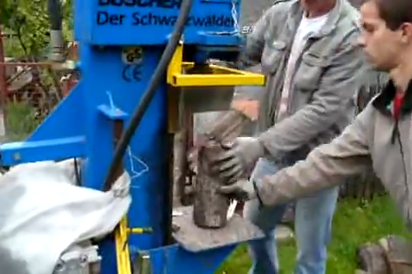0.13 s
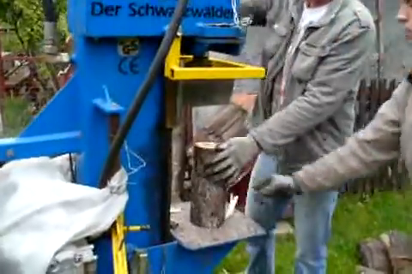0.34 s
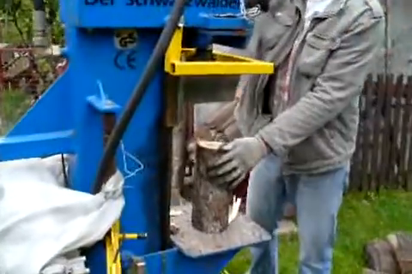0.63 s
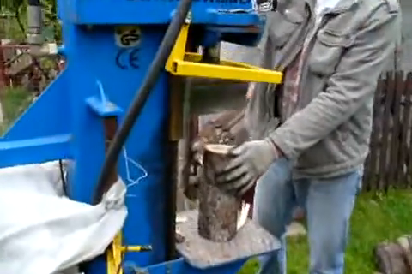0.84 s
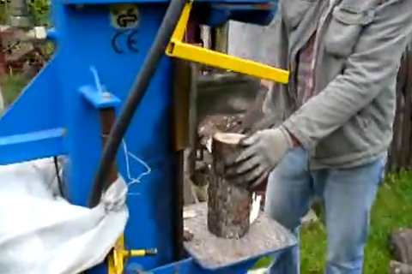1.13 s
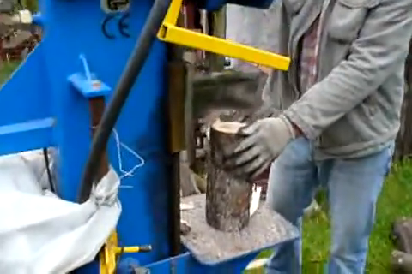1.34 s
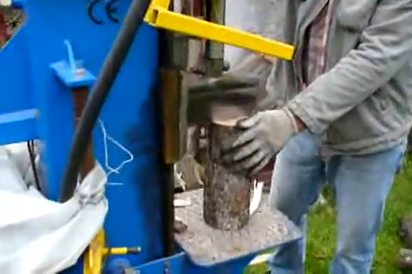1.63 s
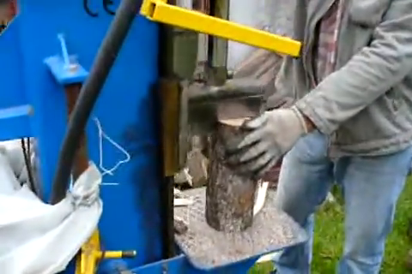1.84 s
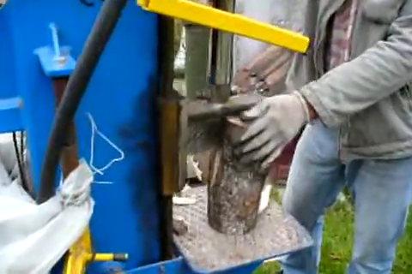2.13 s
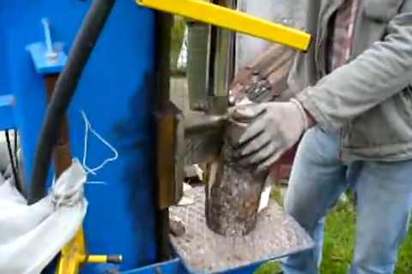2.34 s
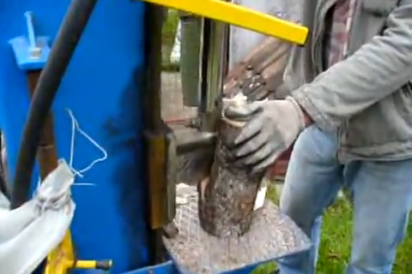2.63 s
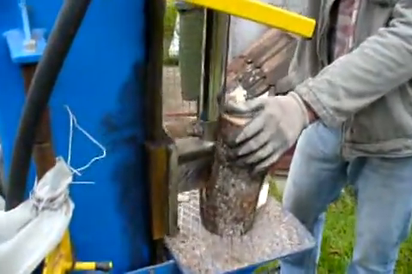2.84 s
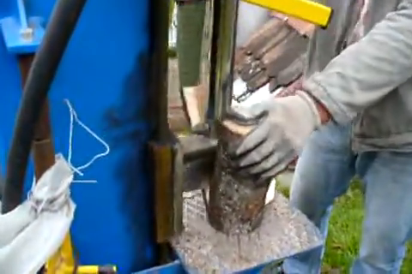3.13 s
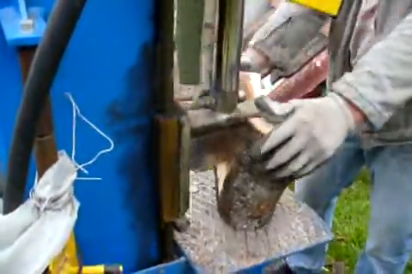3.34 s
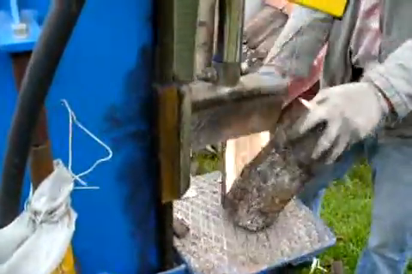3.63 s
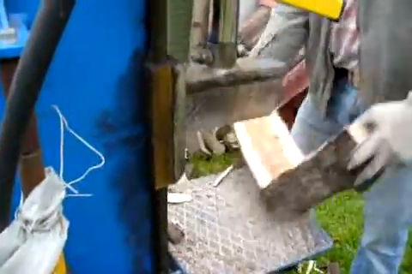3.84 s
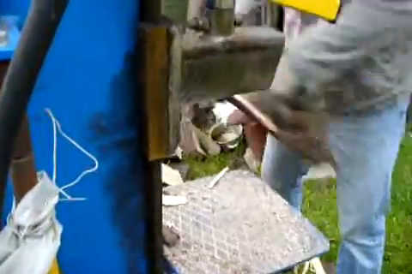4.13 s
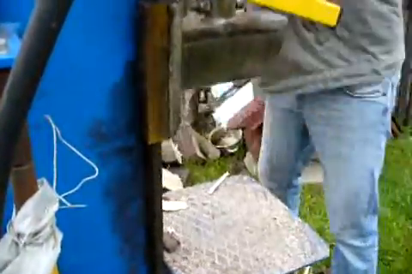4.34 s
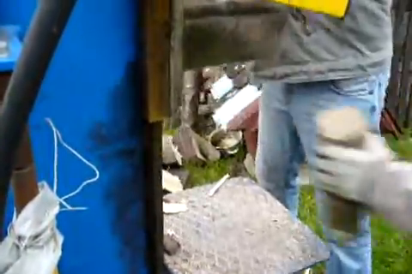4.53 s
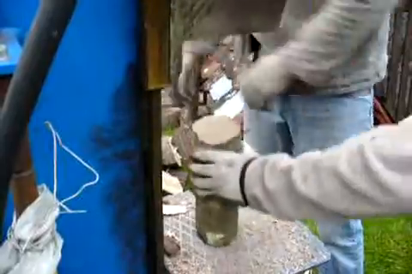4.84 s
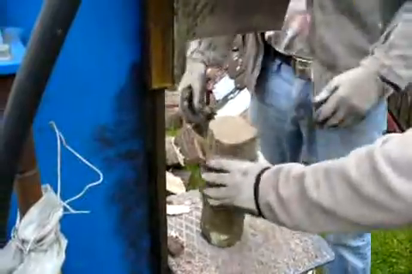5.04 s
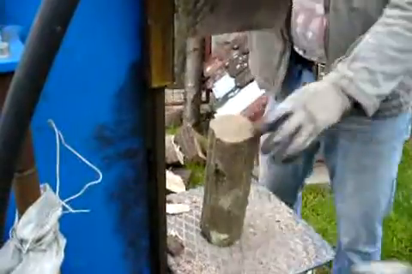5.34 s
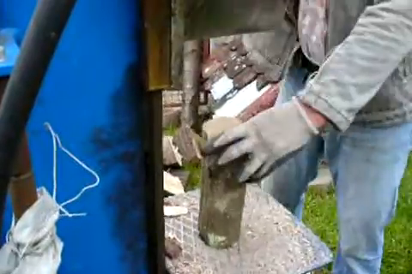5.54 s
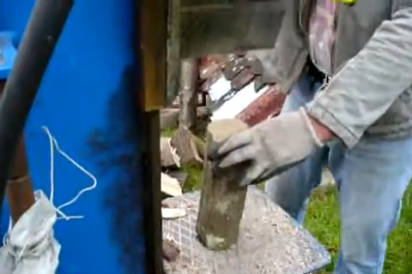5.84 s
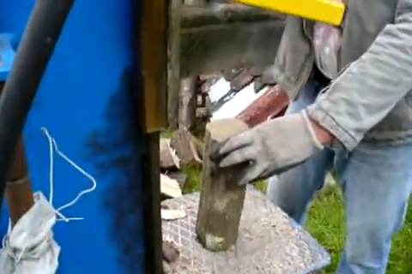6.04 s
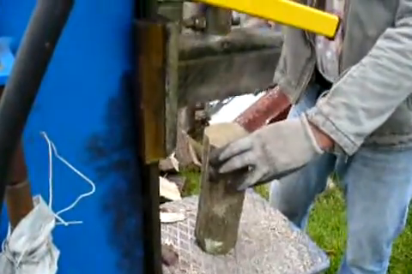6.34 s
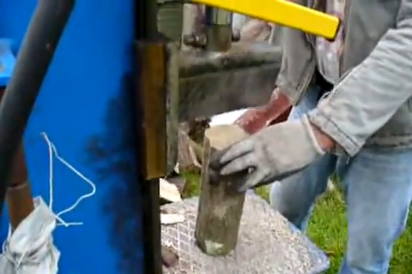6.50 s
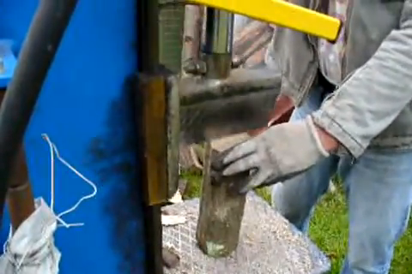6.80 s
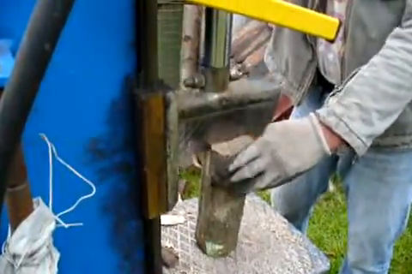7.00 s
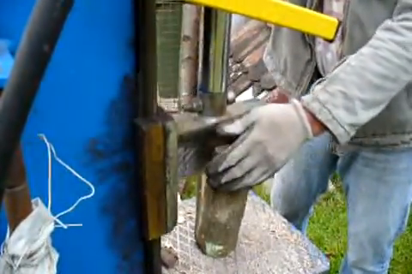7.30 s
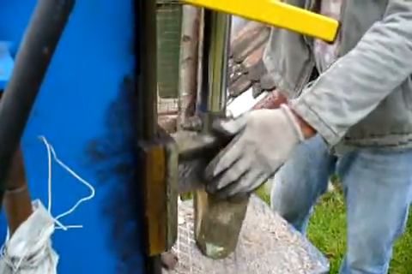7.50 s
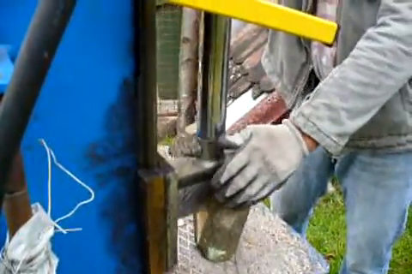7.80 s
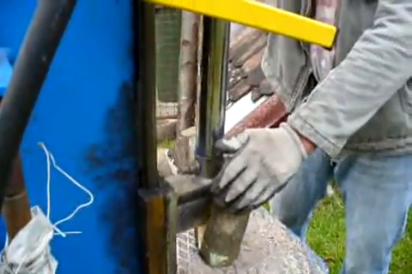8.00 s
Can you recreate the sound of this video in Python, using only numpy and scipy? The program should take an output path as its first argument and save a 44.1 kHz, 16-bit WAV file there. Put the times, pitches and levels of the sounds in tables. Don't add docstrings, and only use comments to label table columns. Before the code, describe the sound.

A diesel engine drones close by for all eight seconds, throbbing low with rough clatter, ringing gear whirr and a tonal hydraulic pump whine. At about 0.6 to 0.8 s small lever ticks and short oil hisses start the ram. Around 1.7 s a rapid cluster of woody knocks leads into violent, clipped cracks until 1.9 s, with tearing fibre and scattered snaps to 2.7 s. At 3.1 s the halves part with a hollow clack. The engine pitch sags slightly during the return, lowest near 4.3 s. A new log knocks on the steel table from 4.6 to 5.1 s. At 5.8 s come another knock, snap and oil hiss; the pump strains, and from 7.0 to 8.0 s the second log cracks, crackles and tears, with strong snaps near 7.0, 7.4 and 7.6 s. The sound is dull, band-limited and overloaded, with a faint close echo.

```python
import sys
import numpy as np
from scipy import signal
from scipy.io import wavfile
from scipy.ndimage import uniform_filter1d

SR = 44100
rng = np.random.default_rng(int(sys.argv[2]) if len(sys.argv) > 2 else 0)


def to_wav(sig):
    pcm = np.clip(np.atleast_2d(sig), -1, 1) * 32767
    pcm = np.round(pcm).astype(np.int16)
    wavfile.write(sys.argv[1], SR, pcm.T)


def attenuation_scalar(level_db):
    decades = np.asarray(level_db, float) / 20
    return 10 ** decades


N = 359849

# (multiple of the engine cycle [1], level [dB])
EXHAUST_ORDERS = [(1, -30.5), (2, -27.5), (3, -28), (4, -18), (5, -14), (6, 2), (7, -2.5), (8, -20),
                  (9, 4.5), (10, -15), (11, -18), (12, 7.5), (13, -14.5), (14, 0), (15, -11), (16, -2),
                  (17, -18.5), (18, -3.5), (19, -13), (20, -12), (21, -1), (22, -14), (23, -17), (24, -17),
                  (25, -12), (26, -17.5), (27, -6), (28, -20), (29, -1.5), (30, -16.5)]
# (frequency [Hz], level per hertz [dB])
BLOCK_SPECTRUM = [(25, -24.5), (45, -8.5), (124, -7), (270, -6), (500, -3.5), (800, -8), (1030, -8),
                  (1310, -10.5), (1700, -12.5), (2200, -12.5), (3150, -12), (3800, -19.5), (4500, -18.5),
                  (5300, -23)]
# (time [s], twelfth order of the cycle [Hz])
ENGINE_SPEED = [(0, 134.5), (1.1, 135), (1.9, 133.6), (3.2, 133.5), (3.6, 131.3), (4.3, 129.7),
                (5.0, 130.4), (5.6, 133.6), (7.1, 133.5), (7.5, 132.7), (8.16, 133)]
# (frequency [Hz], width [Hz], level [dB], part [name])
LOADED_RINGS = [(1319, 46, -0.3, "upper case"), (1683, 36, -0.5, "ram guide"),
                (1541, 30, -0.5, "ram guide"), (1263.3, 37, 0.5, "lower case"),
                (1679, 21, -12, "third mesh"), (1297, 11, -14, "third mesh"),
                (1279, 6.9, -12.5, "upper case"), (1892, 44, -2, "third mesh"),
                (1417, 45, -5, "third mesh"), (3717, 80, -16.5, "third mesh"),
                (4220, 75, -17, "third mesh"), (3230, 59, 1.5, "fifth mesh"), (2559, 65, -1, "fifth mesh"),
                (2512, 76, -9.5, "third mesh"), (4800, 40, -2, "fifth mesh")]
# (frequency [Hz], width [Hz], level [dB])
CASE_RINGS = [(627, 38, -32.5), (795, 36, -32.5), (970, 5.8, -54), (1935, 32, -34), (2376, 16, -40),
              (2802, 46, -45.5)]
# (rest [dB], down [dB], split [dB], back [dB])
SHAFT_THROB = [2.4, 2.4, 3, 1.2]
# (start [s], stroke [name])
RAM_STROKES = [
    (0, "rest"),
    (0.762, "down"),
    (1.758, "split"),
    (3.2, "back"),
    (4.919, "rest"),
    (5.8, "down"),
    (6.979, "split"),
]
# (time [s], share of the way [0-1])
LISTENER_WALK = [(0, 0.09), (1.4, 0.1), (1.9, 0.29), (4.5, 1), (6.2, 0.8), (8.16, 0.8)]
PART_LEVELS = {"exhaust": ([-25, -26, -27.5, -27], -2), "rumble": ([-25.5, -26, -26, -26.5], -1.4),
               "clatter": ([-27.5, -28.5, -28.5, -27.5], 0.96), "housing": ([-35.5, -36, -38.5, -47.5],
               7.9), "upper case": ([-31.5, -26, -21, -25], -7), "lower case": ([-35.5, -35.5, -41.5, -31],
               7.1), "third mesh": ([-43, -42, -35.5, -26], 0.29), "fifth mesh": ([-35, -35.5, -35, -35.5],
               -3.4), "ram guide": ([-53, -35, -42.5, -44.5], -2.1)}
# (time [s], level [dB])
OIL_PRESSURE = [(0, -44), (.9, -35.5), (1.6, -44.5), (1.75, -24.5), (2.4, -31.5), (3.1, -24.5), (3.3, -58),
                (4.6, -43.5), (5.6, -32.5), (6.1, -33), (6.35, -25), (7.0, -20.5), (7.06, -29), (7.15, -26),
                (7.7, -22.5), (7.94, -29.5), (8.01, -25), (8.16, -21)]
# (start [s], length [s], boost [dB])
LINE_SURGES = [
    (0.614, 0.97, 10.5),
    (3.508, 1.4, 5),
    (5.004, 0.37, 6),
    (6.962, 0.18, 14.5),
    (7.166, 0.19, 13),
]
# (start [s], length [s], frequency [Hz], level [dB])
VALVE_HISSES = [
    (0.56, 0.089, 1300, -28),
    (0.786, 0.3, 1625, -32),
    (5.8, 0.29, 1630, -28),
]
# (start [s], length [s], level [dB])
FIBRE_TEARS = [
    (1.835, 0.14, -22),
    (2.596, 0.14, -25),
    (7.03, 0.42, -29),
    (7.555, 0.4, -29),
]
# (time [s], peak [dB], frequency [Hz], contact length [s])
LOG_KNOCKS = [(1.707, -8, 560, 0.006), (1.716, -6, 780, 0.011), (1.7265, -7, 840, 0.0067),
              (1.736, -9, 885, 0.008), (1.7435, -10, 800, 0.004), (2.128, -14, 747, 0.012),
              (3.117, -14, 1250, 0.005), (3.127, -13, 1000, .005), (3.1475, -7, 810, 0.007),
              (4.572, -10, 853, 0.0076), (4.861, -12, 560, 0.005), (4.867, -17, 1300, 0.003),
              (4.917, -9, 600, 0.004), (4.933, -16, 2020, 0.004), (4.9365, -10, 600, 0.005),
              (4.957, -14, 760, 0.01), (5.055, -12, 600, 0.004), (5.132, -13, 680, 0.012),
              (5.784, -11.5, 565, 0.011), (6.972, -11, 1200, .003), (6.9885, -10, 840, 0.004),
              (6.995, -10.5, 900, 0.003), (7.0011, -6, 810, 0.007), (7.136, -12, 1200, .004),
              (7.4358, -10, 1210, 0.002), (7.601, -6.5, 820, 0.0054)]
# (time [s], peak [dB], frequency [Hz], decay
# t60 [s])
SMALL_CRACKS = [(0.158, -20, 2310, 0.041), (1.8617, -12.5, 2300, 0.01), (1.8721, -15, 3140, 0.009),
                (1.905, -13, 3220, 0.0092), (1.9195, -2, 2630, 0.0057), (1.9192, -0.5, 4060, 0.0033),
                (2.0108, -14, 3260, 0.011), (2.0948, -16.5, 3600, 0.0061), (2.193, -12, 3200, 0.0051),
                (2.2474, -22, 3240, 0.0087), (2.4629, -16.5, 3230, 0.0087), (2.5273, -18, 2830, 0.008),
                (2.6071, -24, 2900, 0.0088), (2.6495, -9.5, 2760, 0.019), (3.164, -9.5, 2960, 0.04),
                (4.571, -4.5, 3030, 0.015), (5.0948, -11, 3060, 0.015), (5.7865, -7.5, 2700, 0.0103),
                (7.0273, -12, 2530, 0.008), (7.084, -11, 3300, 0.0074), (7.0937, -8, 2850, 0.015),
                (7.119, -23, 3300, 0.006), (7.139, -9.5, 3240, 0.0087), (7.1644, -15, 3900, 0.007),
                (7.1954, -10.5, 3480, 0.0089), (7.2089, -6, 3220, 0.0083), (7.2385, -12, 3970, 0.005),
                (7.2515, -20, 3500, 0.005), (7.2686, -17, 3480, 0.008), (7.3266, -17, 2920, 0.0085),
                (7.3392, -13, 3050, 0.021), (7.385, -15, 3430, 0.0068), (7.4135, -7, 3650, 0.00307),
                (7.4588, -19, 2440, 0.008), (7.478, -12.5, 3920, 0.013), (7.484, -14, 4200, 0.008),
                (7.5247, -15, 2420, 0.0087), (7.602, -13, 2910, 0.011), (7.6554, -17, 2550, 0.0083),
                (7.7487, -21, 3180, 0.0088), (7.7861, -16, 3200, 0.0091), (7.8205, -18, 2400, 0.008),
                (7.9522, -12, 3130, 0.008), (7.882, -13, 2270, 0.019),
                (0.5383, -16, 3800, .005), (.5716, -20, 3800, .005), (.787, -11, 3200, .01),
              (1.741, -19, 2830, 0.017), (1.798, -12.5, 3140, 0.02), (1.833, -10, 3430, .008),
              (1.978, -9, 2320, 0.0088), (2.027, -11, 3000, 0.0074), (3.1392, -13, 3400, .006),
              (3.159, -11, 2160, .015), (3.848, -19.5, 3600, 0.0052), (4.941, -9, 3200, 0.006),
              (6.67, -20, 3800, 0.0053)]
# (time [s], peak [dB], frequency [Hz], decay t60 [s])
LOG_SPLITS = [
    (1.7335, -1.1, 2300, .004),
    (1.8033, 1.6, 2800, .0032),
    (1.8196, 2.4, 2150, .0032),
    (1.8287, 4.5, 2750, .003),
    (3.1442, -7.5, 2100, .035),
    (3.1461, -8.5, 2100, .022),
    (3.1468, -9, 1650, .03),
    (6.9876, -3.6, 1750, .004),
    (7.4349, -1.7, 2540, .006),
]


def rms_one(x):
    return x / np.sqrt(np.mean(x ** 2) + 1e-20)


def in_time(rows):
    s, *columns = np.transpose(rows)
    return [np.interp(np.arange(N) / SR, s, c) for c in columns]


def drift(rate):
    r = np.exp(-80 * np.pi * rate / SR)
    slow = signal.lfilter([1], [1, -2 * r, r * r], rng.standard_normal(N // 40 + 2002))[2000:]
    return np.interp(np.arange(N) / 40, np.arange(len(slow)), rms_one(slow))


def resonate(x, hz, width):
    r = np.exp(-np.pi * width / SR)
    return signal.lfilter([(1 - r * r) / 2, 0, (r * r - 1) / 2], [1, -2 * r * np.cos(2 * np.pi * hz / SR), r * r], x)


def resonate_twice(x, hz, width):
    return resonate(resonate(x, hz, width), hz, width)


def add(out, s, sound):
    i = round(s * SR)
    out[i:i + len(sound)] += sound[:N - i]


def random_ticks(per_s, top):
    strength = attenuation_scalar(4.5 * np.minimum(rng.exponential(1, N), top))
    return strength * rng.choice([-1, 1], N) * (rng.random(N) < per_s / SR)


def swells(table):
    out = np.zeros(N)
    for s, length, height in table:
        add(out, s, height * np.sqrt(np.hanning(round(length * SR))))
    return out


def by_stroke(levels_db):
    out = np.zeros(N)
    for s, stroke in RAM_STROKES:
        out[round(s * SR):] = levels_db[["rest", "down", "split", "back"].index(stroke)]
    return uniform_filter1d(out, round(0.057 * SR), mode="nearest")


def part_db(name):
    levels_db, walk_db = PART_LEVELS[name]
    return by_stroke(levels_db) + walk_db * in_time(LISTENER_WALK)[0]


def exhaust(cycles):
    tones = 0
    for k, db in EXHAUST_ORDERS:
        waver = 0.007 * k * drift(4.6)
        lag = -0.065 * min(k, 12) * (2 * k - min(k, 12))
        tones = tones + attenuation_scalar(db + 1.2 * drift(1.8)) * np.cos(2 * np.pi * k * cycles + lag + waver)
    return attenuation_scalar(part_db("exhaust") + 0.5) * rms_one(tones)


def block(cycles):
    low = high = 0
    edges = 25 * 2 ** np.arange(0, 7.8, 1 / 3)
    white = rng.standard_normal((2, N))
    grit = rms_one(random_ticks(2500, top=6))
    cycle, crank, fire = 2 * np.pi * cycles, 4 * np.pi * cycles, 6 * np.pi * cycles
    firing = attenuation_scalar(0.93 * np.cos(fire) + 0.25 * np.cos(cycle + 0.51))
    puffs = attenuation_scalar(0.61 * np.cos(fire + 0.26) + 1.7 * np.cos(crank + 0.42) + 1.2 * np.cos(cycle + 0.38))
    together = drift(30)
    spectrum_hz, spectrum_db = np.transpose(BLOCK_SPECTRUM)
    for k, (a, b) in enumerate(zip(edges, edges[1:])):
        hz = np.sqrt(a * b)
        share = np.clip((hz - 1500) / 4000, 0, 0.8)
        source = np.sqrt(1 - share) * white[k % 2] + np.sqrt(share) * grit
        band = signal.sosfilt(signal.butter(2, [a, b], "band", fs=SR, output="sos"), source)
        db = np.interp(np.log(hz), np.log(spectrum_hz), spectrum_db)
        puffing = puffs ** np.clip(1.3 - hz / 350, 0, 1)
        band = band * puffing * attenuation_scalar(db + 0.19 * together + 0.4 * drift(27))
        mix = np.clip(np.log2(hz / 700) / 1.48, 0, 1)
        low = low + (1 - mix) * band
        high = high + mix * band
    rumble = attenuation_scalar(part_db("rumble") + 3.5) * rms_one(low)
    clatter = attenuation_scalar(part_db("clatter") + 1.5) * rms_one(high * firing)
    return rumble + clatter


def gearbox(turns, cycles):
    tooth = np.floor(21 * turns + 0.03 * drift(40)).astype(int)
    strikes = np.diff(tooth, prepend=0) > 0
    wear = 0.28 + rng.standard_normal(21)
    blows = rms_one(strikes * (wear[tooth % 21] + 0.7 * rng.standard_normal(N)))
    drive = blows + 0.8 * rng.standard_normal(N)
    crank_throb_db = 1.2 * np.cos(4 * np.pi * cycles)
    throb = attenuation_scalar(by_stroke(SHAFT_THROB) * np.cos(2 * np.pi * turns) + crank_throb_db)
    even_s, even_share = 0.03, 0.75
    out = 0
    for hz, width, db, part in LOADED_RINGS:
        ring = resonate_twice(drive, hz, 1.2 * width)
        ring = ring / uniform_filter1d(ring ** 2, round(even_s * SR)) ** (even_share / 2)
        out = out + attenuation_scalar(part_db(part) + db + 0.23 * drift(1.4)) * rms_one(ring)
    for hz, width, db in CASE_RINGS:
        ring = resonate_twice(drive, hz, 2.5 * width)
        out = out + attenuation_scalar(db + 2.0 * drift(1.2)) * rms_one(ring)
    return out * rms_one(throb)


def pump(turns):
    tooth_db = -36.5 + swells(LINE_SURGES)
    octave_db = in_time(OIL_PRESSURE)[0]
    phase = 2 * np.pi * 12 * turns + 0.3 * drift(12)
    ripple = attenuation_scalar(tooth_db - 2.5 + 3.8 * drift(17)) * np.sin(phase)
    ripple += attenuation_scalar(octave_db - 2 + 2.2 * drift(12)) * np.sin(2 * phase)
    oil = rng.standard_normal(N)
    housing = resonate_twice(oil, 1185, 60) + 0.72 * resonate_twice(oil, 1110, 37)
    return np.sqrt(2) * ripple + attenuation_scalar(part_db("housing") - 1) * rms_one(housing)


def valve():
    out = np.zeros(N)
    for s, length, hz, db in VALVE_HISSES:
        size = round(length * SR)
        hiss = resonate_twice(rng.standard_normal(size), hz, 130)
        add(out, s, attenuation_scalar(db) * rms_one(hiss) * np.hanning(size) ** 0.25)
    return out


def tearing():
    hz, width = 3800, 2400
    shape = swells([(s, length, attenuation_scalar(db)) for s, length, db in FIBRE_TEARS])
    ticks = random_ticks(170, top=3) * shape + 1e-18
    return 2 * resonate_twice(ticks, hz, width) * SR / width / np.pi


def knocks():
    out, t = np.zeros(N), np.arange(6000) / SR
    for s, db, hz, length in LOG_KNOCKS:
        grain = rng.standard_normal(len(t))
        fade = np.exp(-t / max(length, 0.001)) * (1 - np.exp(-t / 0.00088))
        rough = 2.2 * resonate(grain, hz, 250) + 1.6 * resonate(grain, 2.3 * hz, 500)
        rough += 0.35 * resonate(grain, 2900, 2000)
        modes = np.sin(2 * np.pi * hz * t) + 0.37 * np.sin(2 * np.pi * 0.87 * hz * t)
        body = fade * (modes + rough)
        add(out, s, attenuation_scalar(db + 0.5) * body / np.abs(body).max())
    return out


def cracks(table, splinter_db, rise_s):
    out, t = np.zeros(N), np.arange(2200) / SR
    for s, db, hz, t60 in table:
        fade = attenuation_scalar(-60 * t / max(t60, 0.002)) * (1 - np.exp(-t / rise_s)) ** 2
        phase = 2 * np.pi * hz * t
        ring = fade * (np.sin(phase) + 0.5 * np.sin(0.57 * phase) + 0.4 * np.sin(1.325 * phase))
        snap = -ring / np.abs(ring).max()
        splinters = resonate(rng.standard_normal(len(t)), hz, 1800) * attenuation_scalar(splinter_db - 60 * t / 0.096)
        add(out, s, attenuation_scalar(db) * (snap + splinters))
    return out


def scene():
    cycles = np.cumsum(in_time(ENGINE_SPEED)[0]) / SR / 12
    turns = 12 * 21 / 92 * cycles
    machine = exhaust(cycles) + block(cycles) + gearbox(turns, cycles) + pump(turns) + valve()
    wood = tearing() + knocks()
    wood += cracks(SMALL_CRACKS, splinter_db=-13.5, rise_s=0.00032)
    wood += cracks(LOG_SPLITS, splinter_db=-16, rise_s=0.0005)
    echo = signal.lfilter([0.4], [1, -0.6], np.roll(wood, round(0.0099 * SR)))
    return (machine + wood + attenuation_scalar(-16.5) * echo)[None]


def low_pass(x):
    return signal.sosfilt(signal.butter(12, 15750, fs=SR, output="sos"), x)


def record(dry):
    x = np.hstack([dry[:, 4000:0:-1], dry])
    x = signal.sosfilt(signal.butter(3, 3900, fs=SR, output="sos"), x)
    x = x - 0.5 * resonate(x, 4050, 600)
    x = signal.sosfilt(signal.butter(2, 45, "high", fs=SR, output="sos"), x)
    x = signal.sosfilt(signal.cheby2(11, 70, 5630, fs=SR, output="sos"), x)[:, 4000:]
    over_db = np.clip(20 * np.log10(np.abs(x) + 1e-9) + 8.68, 0, 6)
    ramp = 45 * np.arange(N) / SR
    held_db = np.maximum.accumulate(over_db + ramp, axis=1) - ramp
    r = np.exp(-1 / (0.007 * SR))
    x = x * attenuation_scalar(-0.6 * signal.lfilter([1 - r], [1, -r], held_db))
    x = np.clip(x - 0.0149, -0.69, 0.69)
    mirror = resonate(x, 2500, 3000) * np.cos(2 * np.pi * 10600 * np.arange(N) / SR)
    faint = attenuation_scalar(-64.5) * mirror + attenuation_scalar(-92) * rng.standard_normal(N)
    x = x + signal.sosfilt(signal.butter(8, 6800, "high", fs=SR, output="sos"), faint)
    return low_pass(x)


dry = scene()
out = record(dry)
to_wav(out)
```